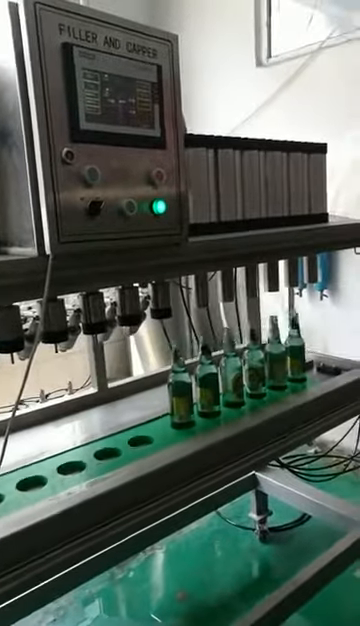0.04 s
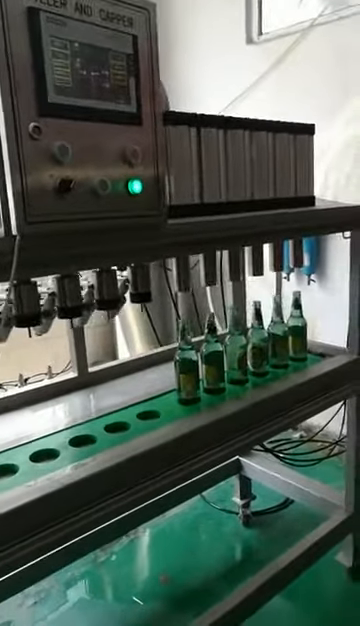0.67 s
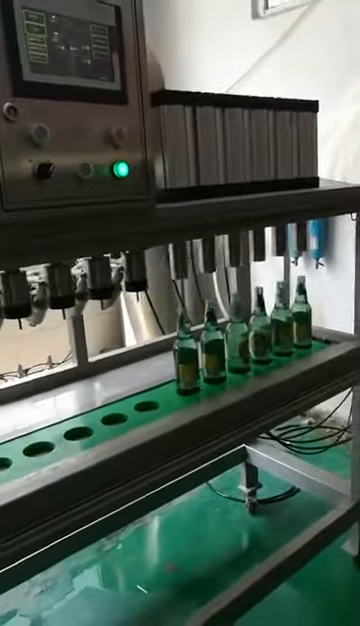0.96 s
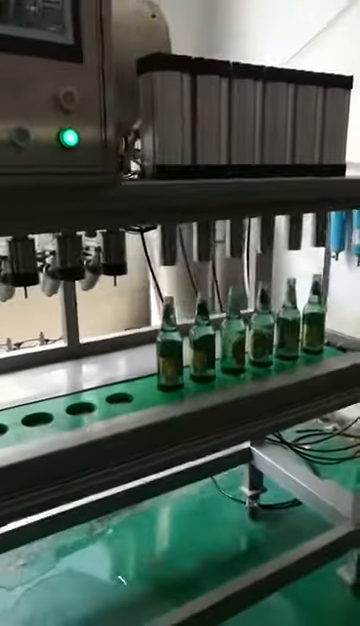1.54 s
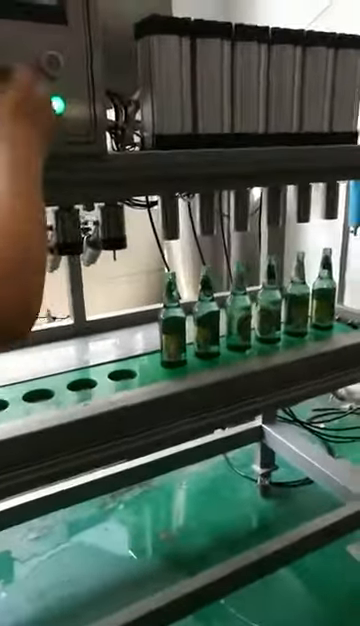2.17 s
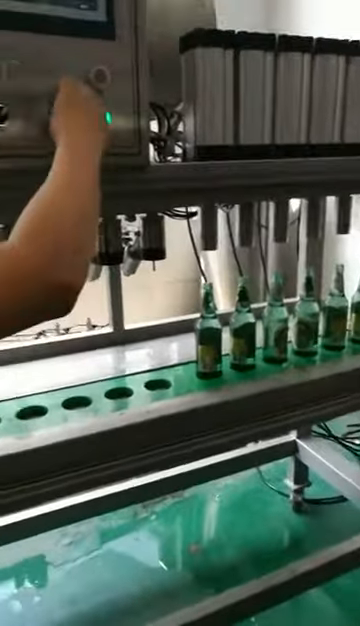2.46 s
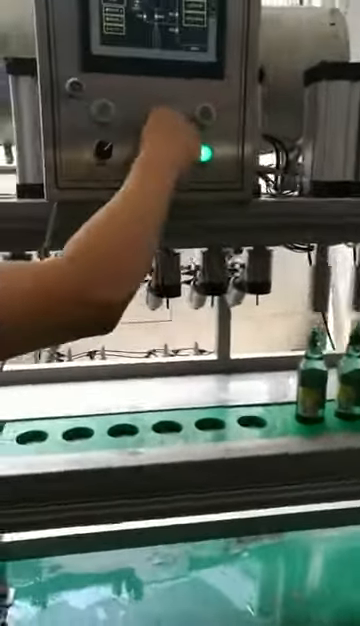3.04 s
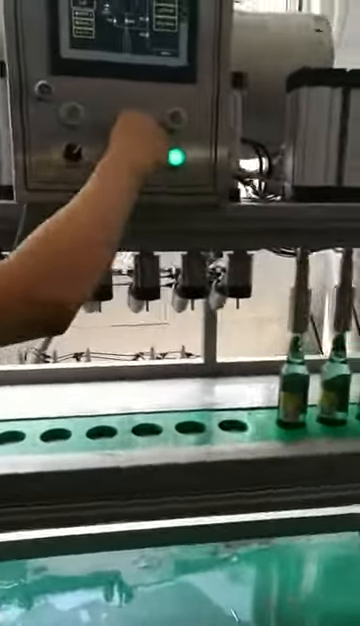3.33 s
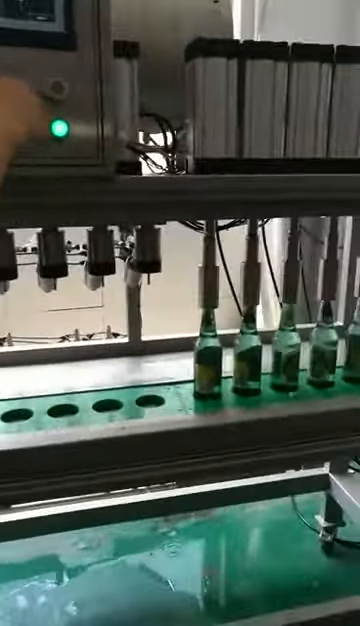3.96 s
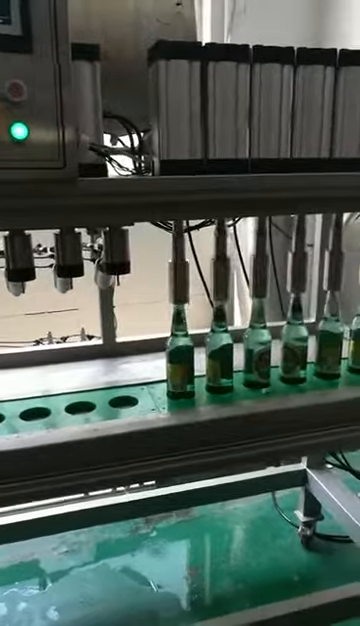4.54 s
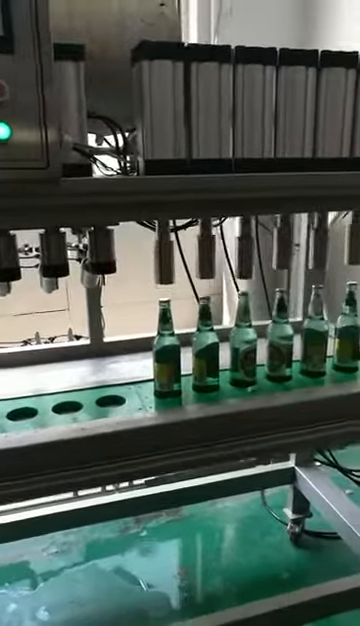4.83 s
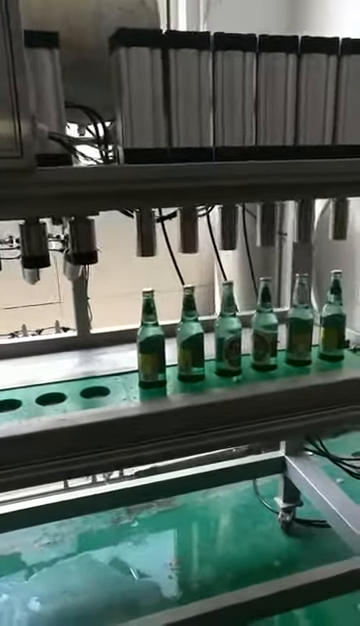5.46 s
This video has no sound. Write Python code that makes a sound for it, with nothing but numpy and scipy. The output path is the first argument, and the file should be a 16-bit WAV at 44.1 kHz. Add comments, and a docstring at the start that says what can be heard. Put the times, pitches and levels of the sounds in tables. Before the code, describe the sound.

From the start, a bottle filling machine rushes and hums in a hard-walled workshop, with a throbbing pump, a faint fading hiss and dull frame rumbles near 0.6 and 1.3 seconds. At about 2.4 seconds the pump stops, the rush drops, and a valve opens with a rough air blast and a low knock. A loud hiss follows for about a second, carrying a high whistle that sinks as the nozzles lower. Light knocks come around 3.2 seconds, then a sharp metal clunk at 3.5 seconds, with a short rattle and ringing steel. Quiet machine noise fills the pause. At 4.2 seconds a short, sharp spit of air starts a second, softer hiss with a falling whistle as the nozzles rise. It fades from 4.9 seconds and is gone by about 5.3. The microphone is nearby and handheld, with a very faint deep handling rumble.

```python
"""First you hear machinery rushing and droning in a hard-walled workshop: an air-driven bottle filler.
The rush drops, a valve opens with a blast, and cylinders lower the nozzles while their escaping air
hisses with a sinking whistle. The nozzles land with a clunk that sets the steel frame ringing.
Then the valve switches back and the nozzles rise with a second hiss."""
import sys
import numpy as np
from scipy import signal
from scipy.fft import rfft, irfft
from scipy.io import wavfile

SR = 44100
rng = np.random.default_rng(int(sys.argv[2]) if len(sys.argv) > 2 else 0)


def wrap_up_sound(samples):
    """Save the sound to the file named by the first command line argument, as 16-bit audio."""
    columns = np.atleast_2d(samples).T
    # keep every value between -1 and 1, then stretch to whole-number steps
    tamed = np.clip(columns, -1, 1)
    steps = np.round(tamed * 32767).astype(np.int16)
    wavfile.write(sys.argv[1], SR, steps)


N = 242550
TIME = np.arange(N) / SR
FREQ = np.maximum(np.arange(N // 2 + 1) * SR / N, 1e-3)
FILL_END_S, ROOM_T60_S, MIC_LAG_S = 2.42, 1, .00061   # a t60 is the time a sound takes to fade by 60 dB


# Tone of the escaping air, going down and going up: (frequency [Hz], level [dB])
DOWN_HISS = [(60, -22), (200, -28.5), (300, -20.5), (480, -20), (900, -1), (1600, -2), (2100, 2),
             (2800, 3.5), (3400, 4), (4600, 1.8), (6000, 1), (7500, -2)]
UP_HISS = [(60, -18.5), (200, -13), (450, -19.5), (900, -4.5), (1800, -3), (2500, 3.5), (2900, 2),
           (3400, 3), (4000, 2), (4400, -1.5), (5300, -0.5), (6500, 0.5), (7500, -2.5)]
# The down stroke, then the up stroke: (valve opens [s], rise time [s], braking starts [s], at rest [s],
# level [dB], fade as pressure sinks [dB/s], extra fade in braking [dB/s], dive in braking [Hz/s])
STROKES = [(2.42, .018, 3.228, 3.49, -23, 5, 25, 10070), (4.172, 0.03, 4.874, 5.3, -28, 6, 53, 12970)]
# Whistles: (stroke [0 down, 1 up], start [s], end [s], first pitch [Hz], settled pitch [Hz], settling
# time [s], level against hiss [dB], lower tone against upper [dB], lower starts [s], lower ends [s])
WHISTLES = [(0, 2.435, 3.345, 7700, 3000, 2.75, -6, -8.5, 2.435, 2.8),
            (1, 4.19, 4.3, 7300, 5920, 0.17, -6.5, -24, 5.8, 3.1),
            (1, 4.32, 4.93, 7550, 5787, .31, -5.5, -1.5, 4.475, 5.3)]
def exhaust(stroke, colour, flutter_db, width_hz, blur_db):
    """Air leaves a cylinder: hiss and whistle sink with the pressure, then fade and dive as it brakes."""
    opens, rise_s, brakes, rests, db, sag, fade, dive = STROKES[stroke]
    ease_s, lower_fade_db_per_s, lift_db_per_s = .018, 6.5, 21.5
    braking_s = ease_s * np.logaddexp(0, (TIME - brakes) / ease_s)   # the cushions take hold gradually
    flow = envelope(opens, rests, rise_s, stop_db_per_s=450)
    flow *= from_db(db - sag * since(opens) - fade * braking_s)
    lift_db = lift_db_per_s * np.minimum(braking_s, .1)   # the narrowing outlet brings out the whistle
    out = jet(flow, colour, flutter_db)
    for owner, start, end, first_hz, settled_hz, settle_s, level_db, lower_db, joins, leaves in WHISTLES:
        if round(owner) == stroke:
            hz = settled_hz + (first_hz - settled_hz) * np.exp(-since(start) / settle_s)
            hz = np.maximum(hz - dive * braking_s, settled_hz / 2)
            gain = flow * from_db(level_db + lift_db) * envelope(start, end, .018, 165)
            lower = from_db(lower_db - lower_fade_db_per_s * since(joins))
            lower *= envelope(joins, leaves, .018, 165)
            out += gain * whistle(hz, lower, width_hz, blur_db)
    return out


def whistle(hz, lower_gain, width_hz, blur_db, lower_ratio=.83):
    """Air swirling past an edge sings two gliding tones, which blur into hiss as the pressure sinks."""
    phase = 2 * np.pi * np.cumsum(hz) / SR
    blur = np.clip(from_db(blur_db) * (hz.max() / hz - 1), 0, 1)
    def wander():
        return np.sqrt(1 - blur) * drift(width_hz) + np.sqrt(blur) * drift(5 * width_hz)
    def tone(angle):
        return wander() * np.cos(angle) + wander() * np.sin(angle)
    outlet_hz, outlet_width_hz, swell_db = 7110, 140, 5   # the upper tone swells at the outlet's own note
    swell = from_db(swell_db / (1 + ((hz - outlet_hz) / outlet_width_hz) ** 2))
    return swell * tone(phase) + lower_gain * tone(lower_ratio * phase)


# The valve's blasts, down then up: (start [s], end [s], level [dB])
BLASTS = [(2.435, 2.494, -15), (4.198, 4.222, -21.5)]
# Tone of each blast: (frequency [Hz], level [dB])
DOWN_BLAST = [(60, -1), (220, -6), (330, 0), (700, -1.5), (1100, 1.5), (1500, 0.5), (2300, 8), (3200, 5),
              (3900, 0.5), (4900, 1), (5600, 0), (6300, 3), (7500, 1)]
UP_BLAST = [(200, -3), (600, 1), (1200, -3.5), (2500, 0), (3300, 5.5), (3800, 12), (4400, -1.5),
            (5800, -12.5), (7100, 3), (7500, 0.5)]
def valve_blasts():
    """The valve dumps the air in the line: a rough burst going down, a short sharp spit going up."""
    out = 0
    for (start, end, db), colour in zip(BLASTS, (DOWN_BLAST, UP_BLAST)):
        flow = from_db(db) * envelope(start, end, attack_s=.011, stop_db_per_s=476)
        out += jet(flow, colour, flutter_db=1.5)
    return out


def air_line_thump(start_s=2.436, hz=203, t60=.055, db=-14.5):
    """Pressure hits the air line and gives one short, low knock."""
    age = since(start_s)
    return from_db(db - 60 * np.minimum(age / t60, 5)) * np.sin(2 * np.pi * hz * age)


# Blows on the frame: (time [s], clank level [dB], thud level [dB], ring level [dB])
BLOWS = [(2.425, -29, -26.5, -59), (2.437, -34, -22.5, -47.5), (3.177, -35, -59, -46),
         (3.216, -34.5, -35, -44.5), (3.237, -42, -38.5, -54), (3.476, -25.5, -26, -57),
         (3.488, -15, -31, -30), (3.502, -16, -22.5, -28), (3.523, -28.5, -25, -31), (3.54, -24, -29, -44),
         (3.563, -30.5, -34, -47), (3.593, -35.5, -34.5, -45), (4.188, -45, -36.5, -54)]
# Tone of the panels' clank, the steel's crack and the table's thud: (frequency [Hz], level [dB])
CLANK = [(150, -16), (300, -7), (380, 4.5), (540, 4), (750, -2.5), (1000, 0.5), (1500, 1.5), (2300, 0),
         (3000, -6), (4200, -6.5), (5200, -14), (6200, -11), (8000, -25)]
CRACK = [(500, -19), (1100, -10), (2400, 8.5), (3200, -0.5), (4300, -9), (7500, -17)]
THUD = [(30, -30), (70, 3), (130, -9.5), (215, 1.5), (295, -28.5), (380, -19), (550, -16), (900, -5),
        (3000, -40.5)]
def clunks():
    """Steel meets steel with a crack; the panels clank, the table thuds and the frame rings on."""
    times, clank_db, thud_db, ring_db = np.transpose(BLOWS)
    hits = [round(time * SR) for time in times]
    clank = struck_noise(hits, clank_db, CLANK, t60=.14, tail_db=-13.5, tail_hz=3500)
    crack = struck_noise(hits, clank_db - 3, CRACK, t60=.036, tail_db=-26, tail_hz=3000)
    thud = struck_noise(hits, thud_db, THUD, t60=.15, tail_db=-19.5, tail_hz=600)
    return crack + clank + thud + frame_ring(hits, ring_db)


def struck_noise(hits, levels_db, colour, t60, tail_db, tail_hz):
    """Each blow rings so many notes that they blend into noise; the room adds a duller tail."""
    gain = from_db(curve(colour))
    near, far = stereo_noise(gain), stereo_noise(gain / np.hypot(1, FREQ / tail_hz))
    near_power, far_power = np.zeros((2, N))
    quick, slow = decay(t60) ** 2, decay(ROOM_T60_S) ** 2
    for at, db in zip(hits, levels_db):
        near_power[at:] += from_db(db) ** 2 * quick[:N - at]
        far_power[at:] += from_db(db + tail_db) ** 2 * slow[:N - at]
    return near * np.sqrt(near_power) + far * np.sqrt(far_power)


# The steel frame's own notes: (pitch [Hz], level [dB], time to fade by 60 dB [s])
FRAME_NOTES = [(81.7, -5, 1.6), (85, -14.5, 1.1), (128, 1, .9), (137.7, -9.5, 0.82), (162, -6, 0.96),
               (200, -2, 0.26), (243.8, -6.5, 0.62), (373.6, 4.5, 0.16), (393, -25, 0.29),
               (490, -13.5, 1.6), (542, -5.5, 0.3), (585, -4.5, 0.31), (657, -11, 0.93), (938, -10, 0.91),
               (1250, -15.5, 0.74), (1385, -17, 1.5), (1500, -2, 0.24), (1580, -10, 0.92),
               (1896, -19.5, 0.91), (2185, 0, 0.25)]
def frame_ring(hits, levels_db, waver_db=4):
    """Blows feed the frame's wavering notes; the higher ones arrive out of step left and right."""
    out = np.zeros((2, N))
    for hz, db, t60 in FRAME_NOTES:
        kicks = np.zeros(N)
        kicks[hits] = from_db(levels_db + db) ** 2
        kept_per_sample = from_db(-120 / (t60 * SR))
        energy = signal.lfilter([1], [1, -kept_per_sample], kicks + 1e-18)
        alike = np.interp(hz, *np.transpose(LIKENESS))
        phase_gap = np.arccos(alike) * rng.choice([-1, 1])
        swing = np.sin(2 * np.pi * (hz * TIME + rng.random()) + np.array([[0], [phase_gap]]))
        out += np.sqrt(energy) * from_db(waver_db * drift(20)) * swing
    return out


# Tone of the machinery's rush: (frequency [Hz], level [dB])
RUSH = [(25, -13.5), (45, -1), (90, -3.5), (140, -3), (180, -1), (260, 1), (320, -2.5), (400, 1),
        (465, -6.5), (620, -2), (760, -3), (900, -1), (1250, -1.5), (2500, -2), (3800, -7), (5000, -14),
        (7500, -21.5)]
# Notes it keeps humming: (pitch [Hz], width [Hz], level against the rush [dB])
HUMS = [(135, 4.7, -16.5), (536.7, 16, -11.5), (690, 26, -17)]
def machinery(flutter_db=.22, churn_db=1.6, bands=14):
    """Running machinery hums and rushes; the rush flutters as a whole and churns band by band."""
    spectrum = rfft(stereo_noise(from_db(curve(RUSH))))
    band = np.digitize(FREQ, np.geomspace(200, 6000, bands - 1))
    rush = sum(irfft(spectrum * (band == k), N) * from_db(churn_db * drift(14.2)) for k in range(bands))
    hums = noisy_notes(HUMS)
    return machinery_level() * (rms_one(rush) * from_db(flutter_db * drift(40)) + hums)


def machinery_level(steady_db=-33, settle_s=.29, drop_s=.11, run_down_db_per_s=3):
    """The machinery settles, surges once, drops when filling ends and then runs down."""
    settling_db = 4.5 * np.exp(-TIME / settle_s)
    surge_db = 1.95 * np.exp(-((TIME - .69) / .26) ** 2)
    idle_s = since(FILL_END_S)
    drop_db = 5.5 * np.minimum(idle_s / drop_s, 1) + run_down_db_per_s * idle_s
    return from_db(steady_db + settling_db + surge_db - drop_db)


# Notes of the filling pump: (pitch [Hz], width [Hz], level [dB])
PUMP_NOTES = [(71.8, 7, -12.5), (533, 12, 0), (573, 16, -1)]
def pump(db=-38, sag_db_per_s=4.5, stop_db_per_s=168, throb_db=1.5):
    """The pump drones with an uneven throb, slowly weakens, and stops when filling ends."""
    level_db = db - sag_db_per_s * TIME - stop_db_per_s * since(FILL_END_S)
    return from_db(level_db + throb_db * drift(30)) * noisy_notes(PUMP_NOTES)


# Dull bumps in the frame, and at 3.16 s the nozzles rubbing into the bottle necks: (time [s], length [s], pitch
# [Hz], level [dB])
RUMBLES = [(0.574, 0.35, 182, -37.5), (1.287, 0.33, 165, -44.5), (3.16, 0.22, 346, -43),
           (3.184, 0.19, 173, -47), (5.112, 0.25, 163, -50.5)]
def low_rumbles(width_hz=36):
    """Low swells that rise quickly and fade: the frame rumbling, and the nozzles rubbing into the bottle necks."""
    out = 0
    for start, length, hz, db in RUMBLES:
        swell = np.sin(np.pi * np.clip((TIME - start) / length, 0, 1) ** .55)
        out += from_db(db) * swell * stereo_noise(resonance(hz, width_hz))
    return out


# Tone of the faint hiss: (frequency [Hz], level [dB])
FAINT_HISS = [(1500, -17.5), (4500, -0.5), (7500, -2.5)]
def faint_hiss(db=-42.5, fade_db_per_s=18):
    """A thin hiss above the machinery that soon dies away."""
    return jet(from_db(db - fade_db_per_s * TIME), FAINT_HISS, flutter_db=3.5)


# Movements of the hand: (start [s], end [s], level [dB])
HAND_MOVES = [(0, 1.095, -54), (1.047, 2.048, -48), (3.9, 5.305, -62)]
def hand_rumble():
    """The hand holding the microphones makes a deep rumble whenever it moves."""
    level = sum(from_db(db) * envelope(start, end, .2, 55) for start, end, db in HAND_MOVES)
    return level * stereo_noise(resonance(hz=15, width_hz=11))


def thin_high_chirp():
    """A brief, thin chirp near 8 kHz, on the left only."""
    level = from_db(-40) * envelope(3.468, 3.488, attack_s=.01, stop_db_per_s=1500)
    return level * stereo_noise(resonance(hz=8250, width_hz=110)) * [[1], [0]]


def workshop(x, early_t60=.049, direct_db=-5, tail_db=-6.5, places=30):
    """Sound arrives left first, then off nearby steel (changing as the listener moves), then the room."""
    direct = np.array([x, np.interp(TIME - MIC_LAG_S, TIME, x)])
    tail = rms_one(stereo_noise(1) * decay(ROOM_T60_S)) / np.sqrt(N)
    room = signal.fftconvolve(x[None], tail[:, :int(SR * np.sqrt(2))], axes=-1)[:, :N]
    out = from_db(direct_db) * direct + from_db(tail_db) * room
    echoes, size = stereo_noise(1), N // places
    for place in range(places):
        early = echoes[:, place * size:(place + 1) * size] * decay(early_t60)[:size]
        early = rms_one(early) / np.sqrt(size)
        near = np.arange(max(place - 1, 0) * size, (place + 1) * size)
        here = x[near] * np.cos(np.pi / 2 * (near / size - place))   # fades in and out around this place
        heard = signal.fftconvolve(here[None], early, axes=-1)[:, :N - near[0]]
        out[:, near[0]:near[0] + heard.shape[1]] += heard
    return out / np.sqrt(1 + from_db(direct_db) ** 2 + from_db(tail_db) ** 2)


# How alike the room sounds left and right: (frequency [Hz], likeness [1 same, -1 opposite])
LIKENESS = [(100, 1), (200, 1), (310, 0.93), (430, 0.21), (520, -0.4), (700, -0.63), (850, 0.091),
            (1100, 0.46), (1500, 0.18), (2400, -0.037), (8000, .09)]
def stereo_noise(gain, ripple=.067):
    """Room noise of strength 1; the gap between the two microphones ripples their likeness."""
    mid, side = rfft(rng.standard_normal((2, N)))
    alike = curve(LIKENESS)
    alike = np.clip(alike + ripple * (1 - alike) * np.cos(2 * np.pi * FREQ * MIC_LAG_S), -1, 1)
    pair = np.sqrt(1 + alike) * mid + np.sqrt(1 - alike) * side * [[1], [-1]]
    return rms_one(irfft(pair * gain * FREQ / np.hypot(FREQ, 20), N))


def jet(flow, colour, flutter_db):
    """Swirling air leaves an opening as a fluttering hiss."""
    hiss = rms_one(irfft(rfft(rng.standard_normal(N)) * from_db(curve(colour)), N))
    return flow * hiss * from_db(flutter_db * drift(37))


def noisy_notes(notes):
    """Narrow bands of noise, each heard as a rough hum."""
    return sum(from_db(db) * stereo_noise(resonance(hz, width)) for hz, width, db in notes)


def resonance(hz, width_hz):
    """Gain that favours the frequencies near one pitch."""
    return 1 / (1 + ((FREQ - hz) / width_hz) ** 2)


def curve(points):
    """Join a table's points into a line across all frequencies."""
    hz, value = np.transpose(points)
    return np.interp(np.log(FREQ), np.log(hz), value)


def drift(rate_hz):
    """A smooth random wobble of strength 1."""
    return rms_one(irfft(rfft(rng.standard_normal(N)) / (1 + (FREQ / rate_hz) ** 2), N))


def envelope(start, end, attack_s, stop_db_per_s):
    """Gain that rises, holds until the end, then dies away."""
    rise = np.minimum(since(start) / attack_s, 1)
    return rise * from_db(-np.minimum(stop_db_per_s * since(end), 200))


def decay(t60):
    """Gain that falls by 60 dB every t60 seconds."""
    return from_db(-60 * np.minimum(TIME / t60, 5))


def since(start):
    """Seconds gone by after a moment, zero before it."""
    return np.maximum(TIME - start, 0)


def from_db(db):
    """Decibels to gain."""
    return 10 ** (np.asarray(db) / 20)


def rms_one(x):
    """Scale to an average strength (rms) of 1."""
    return x / np.sqrt(np.mean(x ** 2) + 1e-20)


def low_pass(x, top_hz):
    """Cut the treble steeply."""
    return signal.sosfilt(signal.ellip(14, .2, 80, top_hz, fs=SR, output="sos"), x)


# How far the sound leans to the left: (frequency [Hz], left minus right [dB])
LEFT_LEAN = [(300, -0.5), (530, 3), (1500, -0.5), (2700, -0.7), (4700, 4), (8000, 5)]
def scene():
    """Air and blows over the machinery, heard from a little to the right of the exhaust."""
    down = exhaust(0, DOWN_HISS, flutter_db=.5, width_hz=100, blur_db=.5)
    up = exhaust(1, UP_HISS, flutter_db=1, width_hz=200, blur_db=-3)
    air = workshop(down + up + valve_blasts() + faint_hiss())
    knocks = air_line_thump() + clunks()
    background = machinery() + pump() + low_rumbles() + hand_rumble()
    lean = from_db(curve(LEFT_LEAN) / 2 * [[1], [-1]])
    return irfft(rfft(air + knocks + background) * lean, N)


def record(dry, ceiling=.65):
    """The loudest peaks are rounded and the treble is cut; the chirp joins before a second, higher cut."""
    rounded = ceiling * np.tanh(dry / ceiling)
    return low_pass(low_pass(rounded, top_hz=7530) + thin_high_chirp(), top_hz=8700)


dry = scene()
out = record(dry)
wrap_up_sound(out)
```